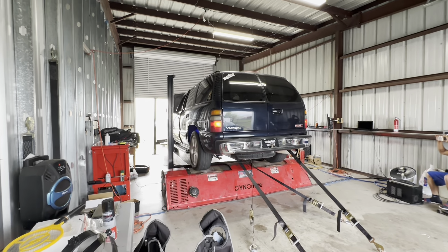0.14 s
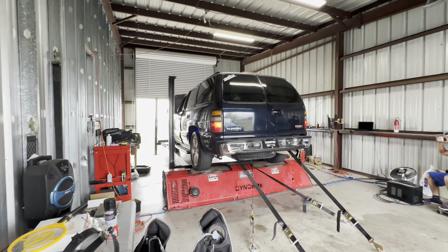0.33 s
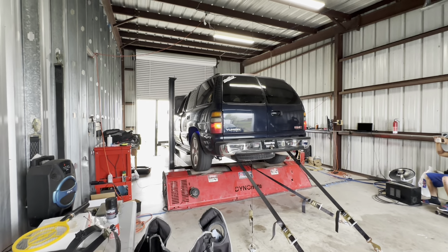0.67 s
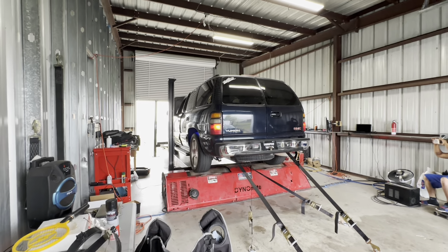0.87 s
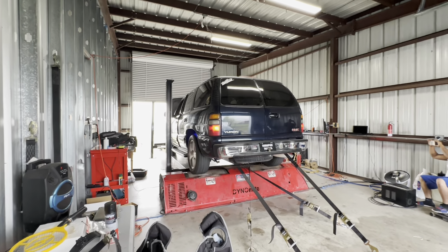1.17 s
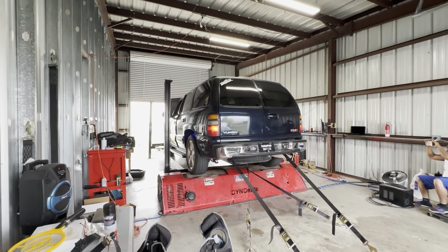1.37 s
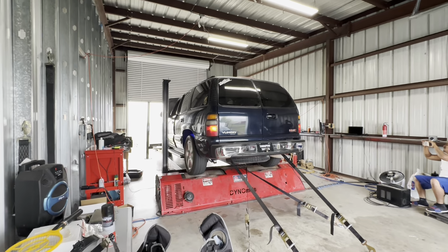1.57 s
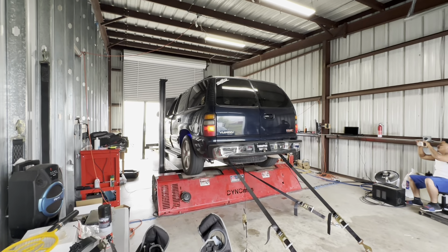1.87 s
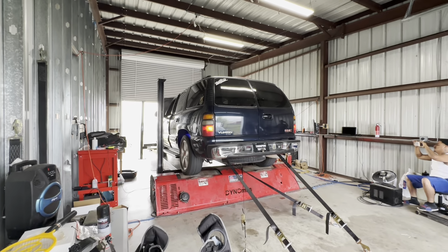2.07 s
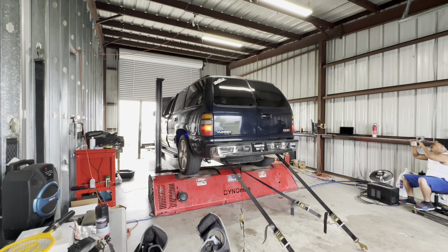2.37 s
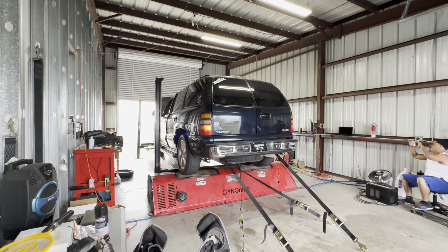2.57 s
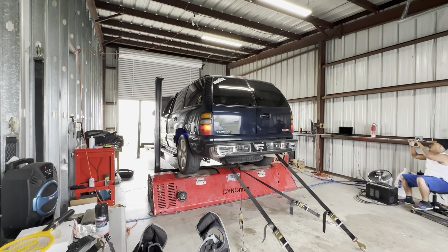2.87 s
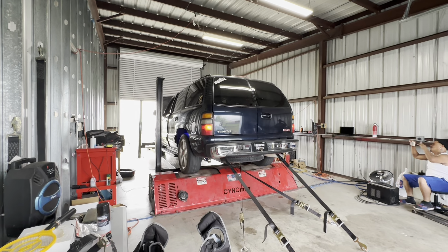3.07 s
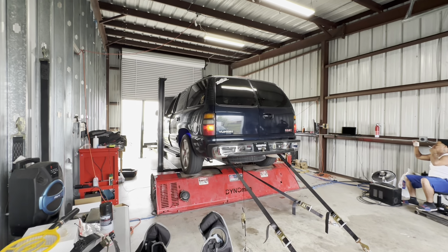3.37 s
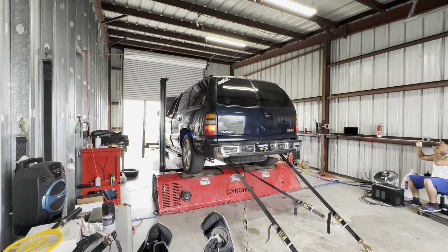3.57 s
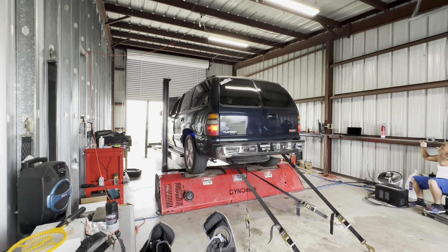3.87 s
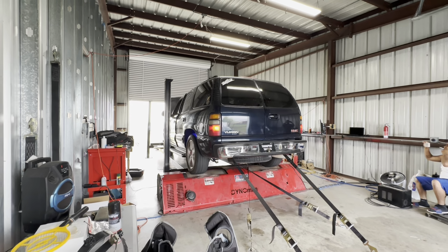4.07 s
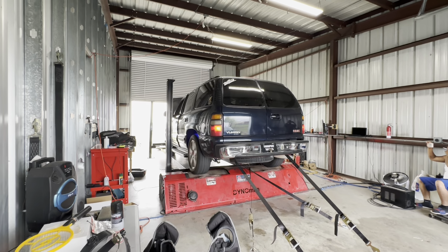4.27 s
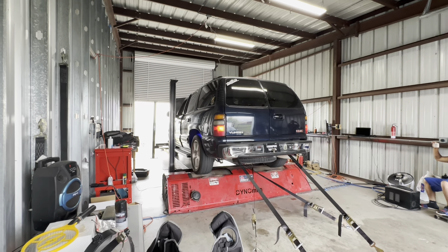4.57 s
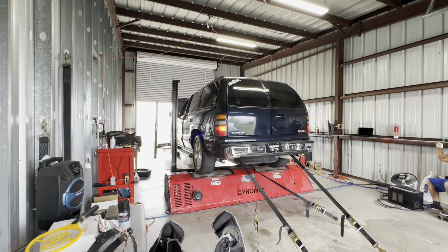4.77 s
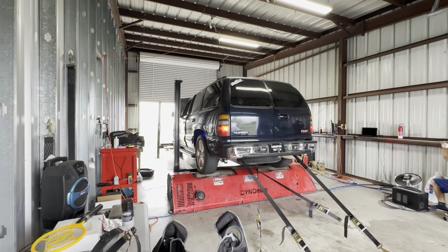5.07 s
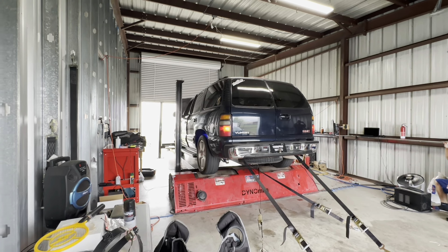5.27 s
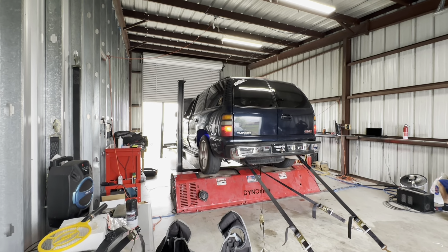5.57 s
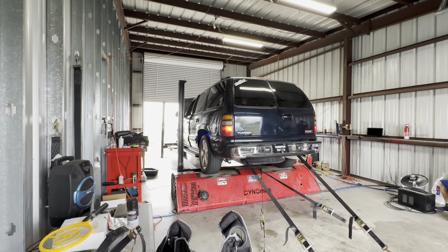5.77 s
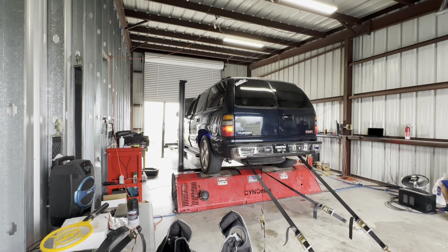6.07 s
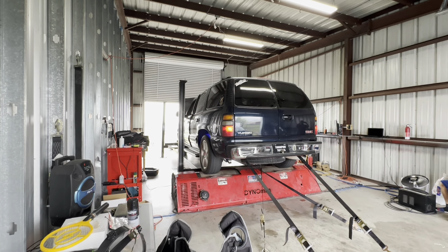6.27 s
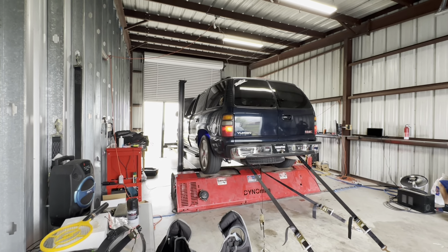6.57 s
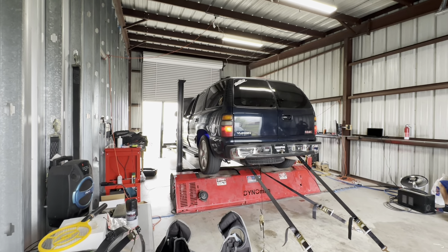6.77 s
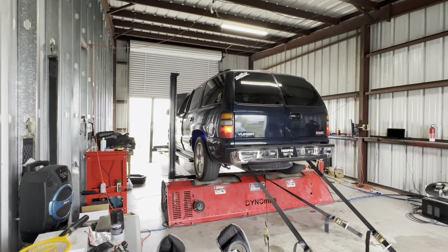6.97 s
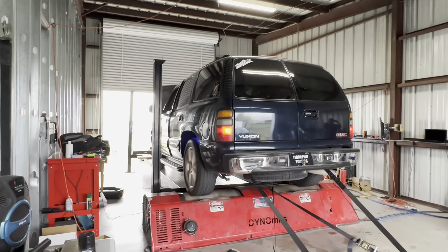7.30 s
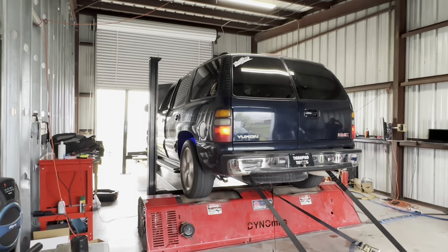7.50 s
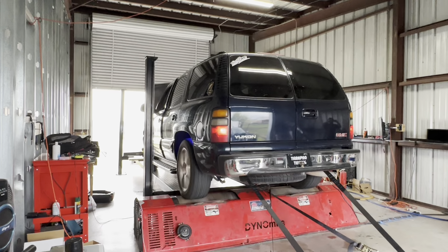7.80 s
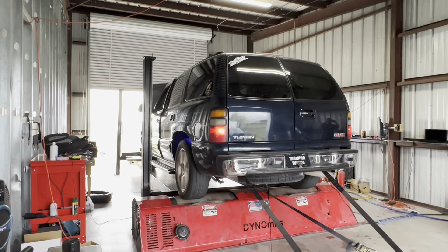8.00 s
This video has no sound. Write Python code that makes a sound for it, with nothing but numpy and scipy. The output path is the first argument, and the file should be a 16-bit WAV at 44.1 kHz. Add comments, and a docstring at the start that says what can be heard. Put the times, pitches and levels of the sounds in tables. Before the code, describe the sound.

Loud V8 exhaust from behind in a sheet-metal workshop: brief pull, lift-off burble, steady drone, then a hard rising pull with thin gear whine.

```python
"""In a sheet-metal shop a V8 truck runs strapped on chassis rollers, heard from behind.
It pulls, lifts off and burbles, cruises, then climbs under full throttle.
The exhaust is a sum of engine orders and random firings, swept through the standing waves of pipes and shop.
Its deepest order is a separate boom; shaped noise makes the exhaust rasp and the roar of tyres and fans.
A gear whine of three gliding partials follows the road speed."""
import sys
import numpy as np
from scipy import signal
from scipy.fft import rfft, irfft, next_fast_len
from scipy.io import wavfile
from scipy.ndimage import uniform_filter1d

SR = 44100
rng = np.random.default_rng(int(sys.argv[2]) if len(sys.argv) > 2 else 0)


def master(y):
    """Save y as 16-bit WAV."""
    cut = np.clip(np.atleast_2d(y).T, -1, 1)
    pcm = np.round(cut * 32767)  # scale
    wavfile.write(sys.argv[1], SR, pcm.astype(np.int16))


N = 358962
T = np.arange(N) / SR  # time in s

# Engine speed, one cycle being two turns: time_s, cycle_rate_hz
ENGINE_SPEED = [(0.0, 19.23), (0.6, 20.33), (0.92, 20.74), (1.2, 19.9), (1.5, 19.78), (2.1, 18.76),
                (2.4, 18.84), (2.7, 18.63), (3.1, 19.02), (4.0, 19.36), (4.9, 19.92), (5.5, 21.0),
                (5.8, 21.8), (6.4, 24.3), (7.0, 27.42), (7.6, 30.93), (8.14, 34.2)]
# Pull, lift-off, coast, cruise, full throttle; levels drive the resonators:
# time_s, exhaust_level_db, throttle_0_to_1, rasp_level_db
DRIVE = [(0.0, -9, 0.82, -30), (0.92, -9, 0.78, -29), (1.05, -19, 0.08, -35.5), (1.2, -17, 0.1, -40),
         (1.5, -14, 0.22, -37), (2.25, -11, 0.27, -39), (2.85, -19, 0.47, -43), (3.15, -18, 0.41, -40),
         (3.6, -13.5, 0.64, -37.5), (4.9, -14.5, 0.65, -34.5), (5.2, -10.5, 0.8, -29.5),
         (5.55, -7, 0.74, -25.5), (5.8, -8, 0.91, -24), (6.1, -7, 0.94, -23), (6.7, -5.5, 0.79, -21.5),
         (7.0, -10, 1, -18.5), (7.6, -12, 0.98, -21.5), (8.14, -6, 0.75, -22)]
# Engine orders of eight firings in two uneven banks, by throttle:
# cycle_multiple, open_level_db, half_level_db, shut_level_db
ENGINE_ORDERS = [(4, -34, -24.5, -28), (5, -11, -20.5, -43), (6, -15, -28, -3), (7, -17, -17.5, -13),
                 (8, 2, -8, 2), (9, -16, -19, -15), (10, -8, -28.5, -23), (11, 0, -37.5, 0.5),
                 (12, -25, -6.5, -7), (13, -15.5, -3, -21), (14, -16.5, -37, -10), (15, -11.5, -28, -2),
                 (16, -9, -10, -9), (17, -30.5, -22.5, -35), (18, -11, -30, -17), (19, 1, -57, -5),
                 (20, -8.5, -32, -5), (21, -11, -10, -11.5), (22, -6, -25.5, -6.5),
                 (23, -19.5, -8.5, -22.5), (24, -3.5, -36.5, -1), (25, -23, -9.5, -31),
                 (26, -16.5, -7, -24)]
# Firing turns uneven as the throttle shuts: throttle_0_to_1, level_re_exhaust_db
UNEVEN_FIRING = [(0, -23), (0.4, -27), (0.62, -42), (1, -40)]
# Standing waves of pipes and shop: pitch_hz, width_hz, left_level_db, right_level_db
STANDING_WAVES = [(79.7, 11, -2.5, -2), (87.2, 6.3, 4, -1), (106, 13.5, -2.5, -3), (141.4, 8.3, -12, -0.5),
                  (155.96, 6.95, -11.5, -1), (167.6, 14.4, -7.5, -3.5), (178, 7.8, -34, -54.5),
                  (230, 18.2, -8.5, -8), (238, 21, -24.5, -28), (264.1, 10.8, -15.5, -11),
                  (310.8, 5.5, -10.5, -10.5), (326.3, 20.6, -7.5, -6.5), (358.7, 4.1, -16, -14.5),
                  (386, 7.2, -27.5, -12.5), (435.9, 8.4, -9, -12), (469, 2.1, -10.5, -18.5),
                  (500.5, 7.9, -10, -23.5), (522, 7.4, -32.5, -27.5), (690, 120, -22, -43.5),
                  (732, 130, -28, -21), (886, 45, -17.5, -26)]
# Third multiple of the cycle, the beat of the uneven banks, with throttle shut, half and open:
# shut_re_exhaust_db, half_re_exhaust_db, open_re_exhaust_db
BOOM_LEVELS = (-10.5, -20, -39)
# How the shop lifts or cancels the boom as it climbs: pitch_hz, gain_db
BOOM_RESPONSE = [(56, -1.5), (62.5, 2.2), (66, 14.5), (77, 16.5), (83, 32), (90, 34.5), (92.5, 26.5),
                 (94.3, 2), (96.5, 15.5), (102.5, 12.5)]
# Relative noise density of the exhaust rasp: pitch_hz, density_db
RASP_SPECTRUM = [(180, -61), (300, 0.5), (328, 1), (410, -2.5), (536, -8.5), (660, -16.5), (916, -3.5),
                 (1350, -12), (2040, -13), (4300, -22), (7030, -32), (7910, -34), (8920, -38),
                 (10500, -110), (13600, -89), (22000, -120)]
# Sheet metal that rings with the rasp: pitch_hz, width_hz, level_db
PANELS = [(1430, 18, 2), (2010, 60, -4), (2690, 25, 0), (3020, 23, -4), (3210, 25, 1), (3700, 50, -4)]
# Road speed, given as the pitch of the gear mesh: time_s, mesh_hz
ROAD_SPEED = [(0, 4950), (0.9, 5410), (1.2, 5430), (2.1, 5150), (2.6, 4980), (3.0, 4950), (3.5, 4990),
              (5.0, 5235), (5.4, 5380), (6.2, 5990), (7.0, 7050), (7.6, 7990), (8.14, 8870)]
# How loud a gear tone sounds at each pitch; a band near 11.5 kHz is nearly silent: pitch_hz, level_db
WHINE_RESPONSE = [(4950, -47.5), (5250, -45.5), (5550, -42), (6000, -45), (6800, -48), (7700, -44.5),
                  (8900, -47), (10000, -42.5), (10900, -49), (11600, -75), (12400, -44), (14800, -33)]
# Overtones of the whine: mesh_multiple, level_db
WHINE_OVERTONES = [(2, -16.5), (3, -32)]
# Relative noise density of tyres, rollers and fans; a band near 11.5 kHz is nearly silent: pitch_hz, density_db
ROAR_SPECTRUM = [(40, -44), (150, -2.5), (500, -11), (640, -29.5), (1090, -9), (1700, -21.5), (2300, -13.5),
                 (3600, -20), (5000, -18), (6000, -20), (6800, -31), (9900, -26), (10700, -50.5),
                 (11500, -95), (12500, -38.5), (15700, -38)]
# Roar level against road speed: mesh_hz, level_db
ROAR_LEVEL = [(5000, -32.5), (6700, -31), (7700, -26.5), (8900, -28)]
# Coherence of noise between the two sides: pitch_hz, likeness_0_to_1
LIKENESS = [(60, 1), (300, 0.66), (700, 0.1), (1500, 0.032), (9000, 0.034), (12000, 0.18)]
# Balance of noise between the two sides: pitch_hz, left_minus_right_db
BALANCE = [(60, 24), (150, -9.5), (380, 2), (950, 2.5), (2380, -3.5), (5980, 0), (15000, -2)]

LEFT_LAG = -6  # samples: the left side hears the exhaust a little earlier
FLUTTER_DB, SURGE_DB = 3.5, 1.2  # quick and slow swings of the whine
BRIGHT_HZ, BRIGHT_DB = 3040, 5.5  # rasp above this pitch gains so many dB per doubling of engine speed
EDGE_HZ = 15750  # upper band limit


def exhaust(turns):
    """Superposition: a periodic engine gives pure orders, and unequal firings smear them into burble."""
    level_db, throttle, _ = curves(DRIVE)
    throttle = np.clip(throttle, 0, 1)
    driven = gain_of(level_db) * (np.sqrt(2) * orders(turns, throttle) + stumble(turns, throttle))
    left, right = shop(driven)
    pair = np.array([np.roll(left, shift=LEFT_LAG), right])
    upper = signal.lfilter(*signal.butter(2, 480, "high", fs=SR), pair)
    # short waves scatter and break into patches
    return pair - upper + walls(upper, wet_db=6, t60=.3)


def orders(turns, throttle):
    """Harmonic series: each order is a multiple of the cycle, weighted by throttle."""
    tone = np.zeros(N)
    for k, (_, open_db, half_db, shut_db) in enumerate(ENGINE_ORDERS, 4):
        waver_db = .04 * k * drift(size=3000)
        level_db = np.interp(throttle, [0, .5, 1], [shut_db, half_db, open_db]) + waver_db
        tone += gain_of(level_db) * np.cos(2 * np.pi * (k * turns + rng.random()))
    for k in range(27, 45):  # higher multiples come and go, in level and phase
        level_db = 4 * drift(size=2000) - 21.0
        phase = k * turns + 0.34 * drift(size=2000) + rng.random()
        tone += gain_of(level_db) * np.cos(2 * np.pi * phase)
    return tone


def stumble(turns, throttle):
    """Random amplitude modulation: eight pulses per cycle, of chance strength and sign, spread the lines."""
    uneven_db = np.interp(throttle, *np.transpose(UNEVEN_FIRING))
    fires = np.diff(np.floor(8 * turns), prepend=0) > 0
    strength = rng.standard_normal(N) * gain_of(1.5 * drift(size=2500))
    pulses = fires * strength * SR / (2 * curves(ENGINE_SPEED)[0]) * gain_of(uneven_db)
    puffs = uniform_filter1d(pulses, size=30)  # each puff lasts most of a millisecond
    return signal.lfilter(*signal.butter(1, 150, "high", fs=SR), puffs)  # and is followed by suction


def boom(turns):
    """Subharmonic of firing: uneven banks sound the third order, nearly alike at both sides."""
    level_db, throttle, _ = curves(DRIVE)
    boom_hz = 3 * curves(ENGINE_SPEED)[0]
    level_db = level_db + np.interp(throttle, [0, .5, 1], BOOM_LEVELS) + read(BOOM_RESPONSE, boom_hz)
    side_db = [[.8], [-.8]]
    return gain_of(level_db + side_db) * np.sqrt(2) * np.cos(2 * np.pi * 3 * turns)


def rasp(turns):
    """Jet turbulence: gas leaves the pipes in puffs and shakes resonant panels; the shop blurs the beat."""
    beat = 1 + .2 * np.cos(2 * np.pi * turns) + .15 * np.cos(2 * np.pi * 3 * turns)
    hz = np.fft.rfftfreq(N, 1 / SR)
    rings = 1 + sum(gain_of(db) / (1 + (2 * (hz - f) / width) ** 2) for f, width, db in PANELS)
    gas = irfft(rfft(noise(RASP_SPECTRUM, patchy_db=0.85, alike=0.52)) * rings, N)
    top = gas - signal.filtfilt(*signal.butter(2, BRIGHT_HZ, fs=SR), gas)
    rate = curves(ENGINE_SPEED)[0]
    bright_gain = gain_of(BRIGHT_DB * np.log2(rate / rate.min()))
    gas = gas + top * (bright_gain - 1)
    return walls(gain_of(curves(DRIVE)[2]) * beat * gas, wet_db=4.5, t60=0.17)


def whine():
    """Gear-mesh tone: frequency-modulated partials, fuzzier upward, flutter as they glide through reflections."""
    mesh_hz = curves(ROAD_SPEED)[0]
    tone = np.zeros(N)
    for k, (_, partial_db) in enumerate([(1, 0.017)] + list(WHINE_OVERTONES), 1):
        fuzz = .003 * k * (mesh_hz / mesh_hz.min()) ** (k - 1) * drift(size=150)
        mesh_turns = np.cumsum(mesh_hz * (1 + fuzz)) / SR
        heard = k * mesh_hz < EDGE_HZ
        swing_db = FLUTTER_DB * drift(size=500) + SURGE_DB * drift(size=5000)
        level_db = read(WHINE_RESPONSE, k * mesh_hz) + partial_db + swing_db
        tone += heard * gain_of(level_db) * np.cos(2 * np.pi * k * mesh_turns)
    return walls(np.array([tone, tone]), wet_db=-3, t60=.15)


def roar():
    """Broadband noise: tyres on rollers and cooling fans, with a level that follows road speed."""
    return gain_of(read(ROAR_LEVEL, curves(ROAD_SPEED)[0])) * noise(ROAR_SPECTRUM, patchy_db=1.25)


def shop(x):
    """Modal summation: resonances add in complex form, and neighbours can cancel into a notch."""
    size = next_fast_len(N + SR // 2)
    hz = np.fft.rfftfreq(size, 1 / SR)
    f, width, *sides_db = np.transpose(STANDING_WAVES)
    low = hz[hz < 3000]
    modes = 1 / (1 + 2j * (low - f[:, None]) / width[:, None])
    response = np.zeros((2, len(hz)), complex)
    response[:, :len(low)] = gain_of(sides_db) @ modes
    response *= (hz / (hz + 1e-9 - 1j * 34.0)) ** 4  # the microphone drops the deepest bass
    return irfft(rfft(x, size) * response, size)[:, :N]


def walls(x, wet_db, t60):
    """Reverberation: direct sound plus a dense, exponentially decaying tail, different at each side."""
    t = np.arange(SR // 2) / SR
    tail = rng.standard_normal((2, len(t))) * gain_of(-60 * t / t60) * (t > .004)
    tail *= gain_of(wet_db) / np.linalg.norm(tail[0])
    tail[:, 0] = 1  # direct sound
    return signal.oaconvolve(x, tail / np.linalg.norm(tail[0]), axes=1)[:, :N]


def noise(spectrum, patchy_db, alike=-1):
    """Filtered noise: a random short-time spectrum, partly coherent between sides, with drifting patches."""
    frames, hz = N // 256 + 5, np.fft.rfftfreq(1024, 1 / SR)
    a, b, c, d, patches = rng.standard_normal((frames, 513, 5)).T
    patches = uniform_filter1d(patches, size=10, axis=0)  # across pitch
    patches = evened(uniform_filter1d(patches, size=12, axis=1))  # across time
    same = np.clip(read(LIKENESS, hz), alike, 1)[:, None]
    left = a + 1j * b
    right = same * left + np.sqrt(1 - same ** 2) * (c + 1j * d)
    z = np.array([left, right])
    z *= gain_of(read(spectrum, hz)[:, None] + patchy_db * patches)
    z *= gain_of(np.outer([.5, -.5], read(BALANCE, hz)))[:, :, None]
    return evened(signal.istft(z, nperseg=1024, noverlap=768)[1][:, :N])


def engine_turns():
    """Phase is the integral of frequency: engine cycles run so far."""
    return np.cumsum(curves(ENGINE_SPEED)[0]) / SR


def drift(size):
    """Low-passed chance: random values a quarter of size apart, averaged in fours and joined by lines."""
    steps = uniform_filter1d(rng.standard_normal(4 * N // size + 2), size=4)
    return np.interp(np.arange(N), np.arange(len(steps)) * size / 4, evened(steps))


def curves(rows):
    """Linear interpolation in time: each column of a table at every sample."""
    s, *columns = np.transpose(rows)
    return [np.interp(T, s, c) for c in columns]


def read(points, hz):
    """Logarithmic pitch scale: a spectrum table interpolated at the given frequencies."""
    f, value = np.transpose(points)
    return np.interp(np.log(hz + 1), np.log(f + 1), value, left=value[0], right=value[-1])


def gain_of(db):
    """Decibel law: level to amplitude factor."""
    return 10 ** (np.asarray(db) / 20)


def evened(x):
    """Power normalisation: scaled to rms 1."""
    return x / np.sqrt(np.mean(x ** 2) + 1e-20)


def scene():
    """Linear superposition: all sources add at the two microphones."""
    turns = engine_turns()
    return exhaust(turns) + boom(turns) + rasp(turns) + whine() + roar()


def record(dry):
    """Saturation and band limit: peaks above a knee are rounded off, then the top is cut."""
    over = np.maximum(abs(dry) - .75, 0)
    rounded = dry - np.sign(dry) * (over - .2 * np.tanh(over / .2))
    low_pass = signal.firwin(511, EDGE_HZ, window=("kaiser", 9), fs=SR)
    return signal.oaconvolve(rounded, low_pass[None], "same")


dry = scene()
out = record(dry)
master(out)
```